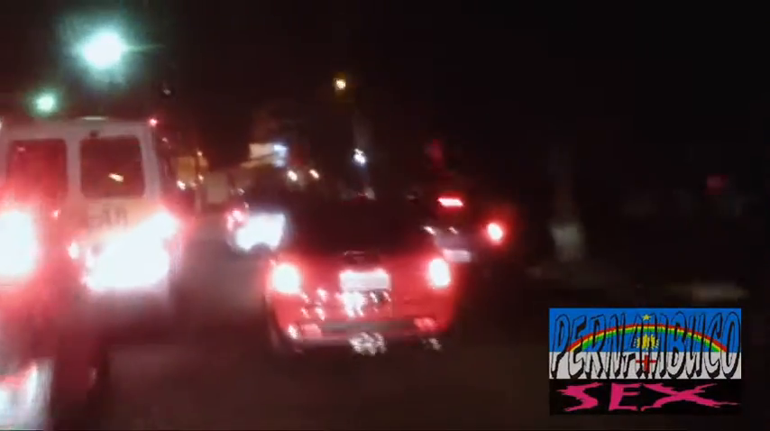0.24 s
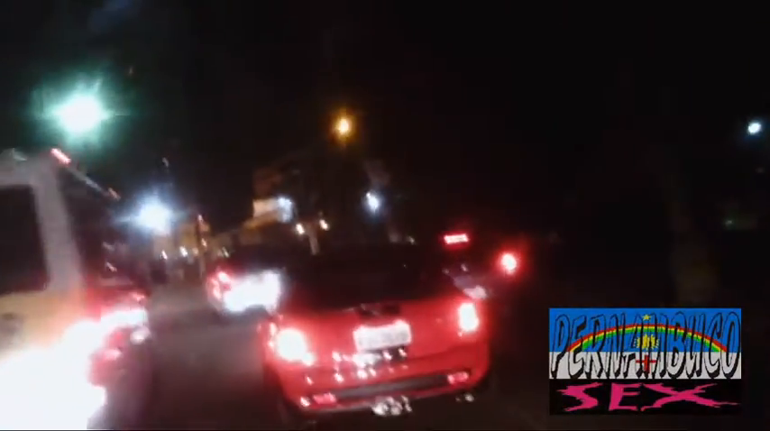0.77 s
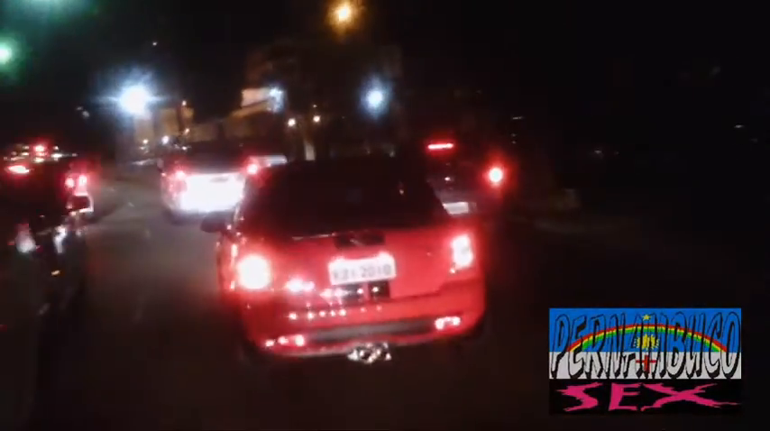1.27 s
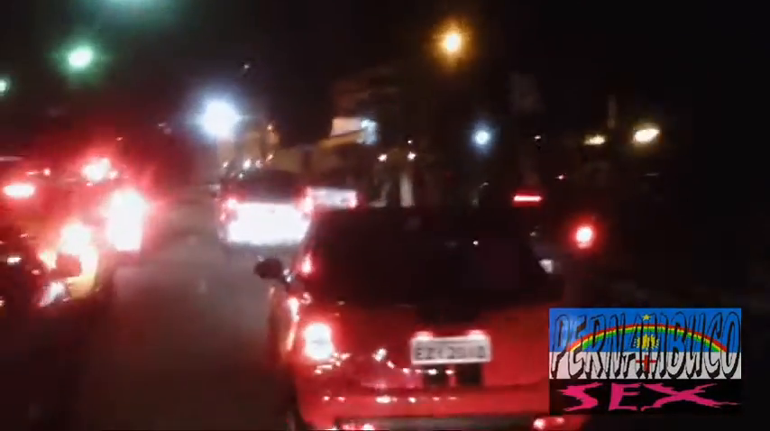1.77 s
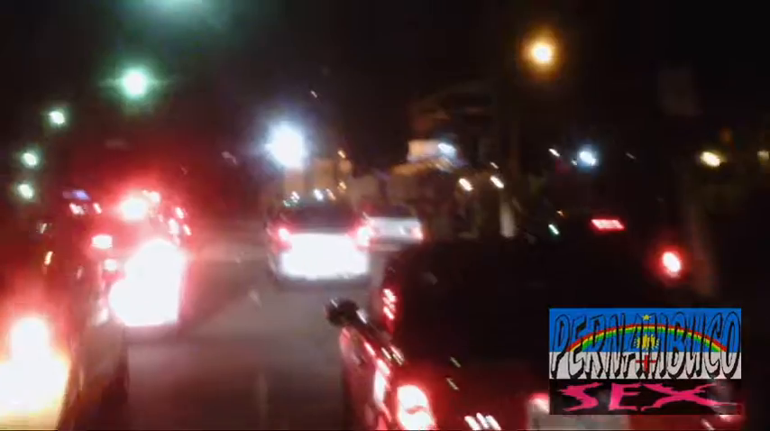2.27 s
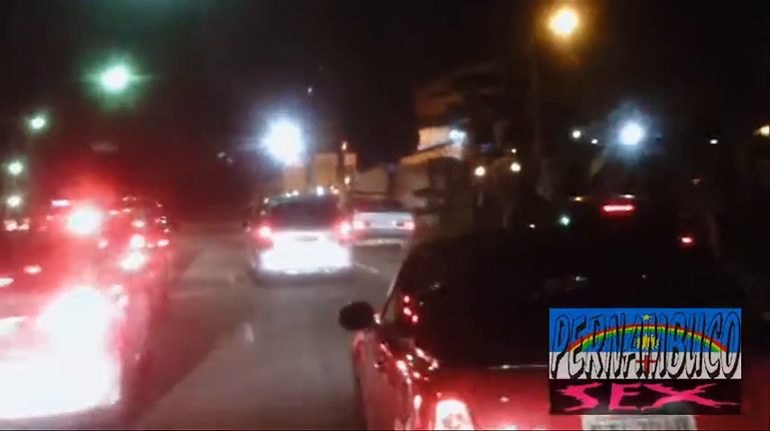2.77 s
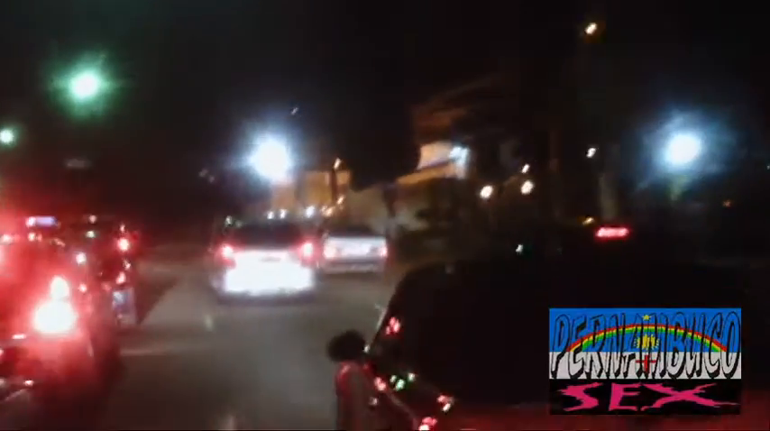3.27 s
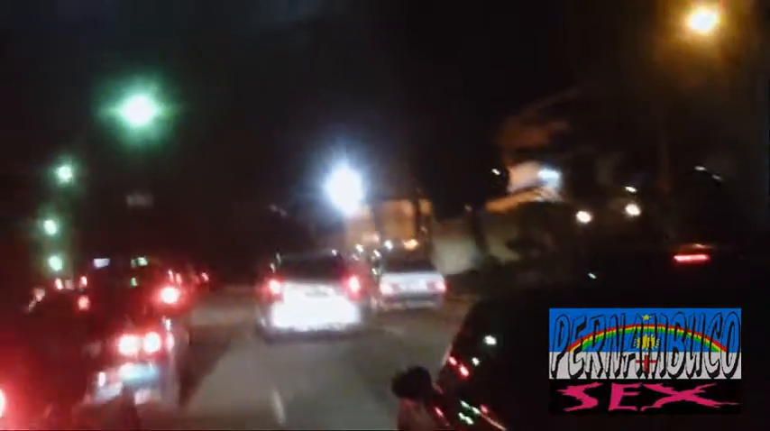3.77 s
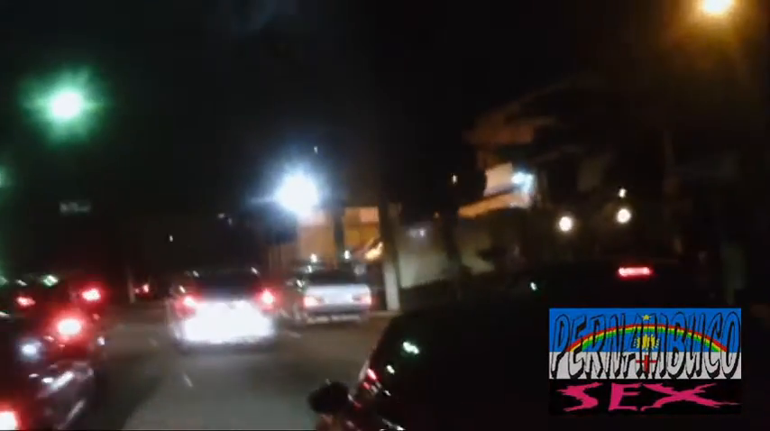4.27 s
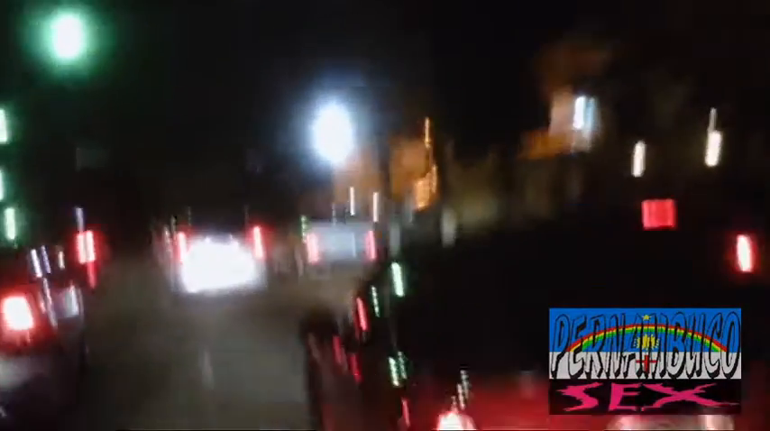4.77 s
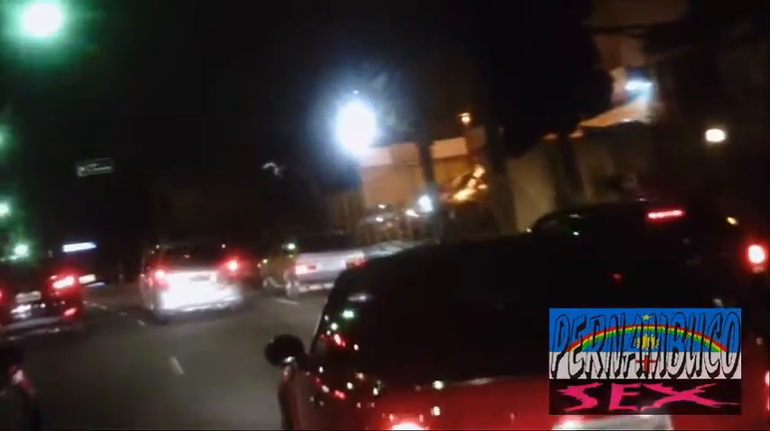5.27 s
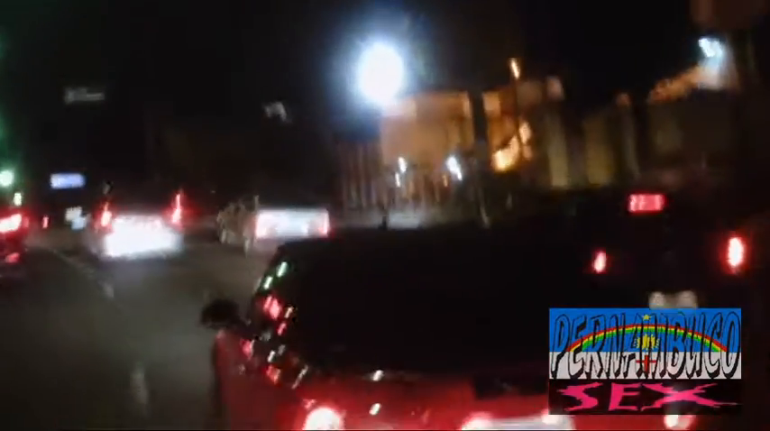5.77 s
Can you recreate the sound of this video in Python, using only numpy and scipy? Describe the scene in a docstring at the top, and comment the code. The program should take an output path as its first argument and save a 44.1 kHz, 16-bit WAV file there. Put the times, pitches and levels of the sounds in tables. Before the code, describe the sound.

Low, booming gusts of wind hit a microphone carried by a motorcycle rider in city traffic. The one-cylinder engine drones clearly at first, then grows quieter as its pitch climbs. Air keeps rushing and hissing past, with a wavering, breathy whistle that flares briefly now and then. Underneath, the hum and tyre noise of surrounding cars swell and fade, with occasional tiny squeaks.

```python
"""On a city street, a one-cylinder motorcycle speeds up between lines of humming traffic, heard from a
small camera on the rider. The exhaust drone rises in pitch and fades under the wind. Gusts boom in a
hollow at the microphone, while the air rushes past, hisses through the ringing camera case and half
whistles over an edge. Now and then something squeaks faintly."""
import sys
import numpy as np
from scipy import signal
from scipy.fft import rfft, irfft, next_fast_len
from scipy.io import wavfile

SR = 44100
rng = np.random.default_rng(int(sys.argv[2]) if len(sys.argv) > 2 else 0)


def dump(signal):
    """Clip the signal to [-1, 1] and save it as 16-bit WAV at the path in sys.argv[1]."""
    limited = np.clip(np.atleast_2d(signal).T, -1, 1)
    pcm = np.round(limited * 32767).astype(np.int16)
    wavfile.write(sys.argv[1], SR, pcm)


N = 265923


def undb(db):
    """Turn decibels into a number to multiply a sound by."""
    return 10 ** (np.asarray(db) / 20)


def unit(x):
    """Scale a sound so that its average strength (rms) is 1."""
    return x / np.sqrt(np.mean(x ** 2))


def curves(table):
    """Join the rows of a time table with straight lines, giving one value per sample."""
    time_s, *columns = np.transpose(table)
    return [np.interp(np.arange(N) / SR, time_s, column) for column in columns]


def colour(points, hz):
    """How strong each frequency is, read from rows of pitch_hz, level_db."""
    pitch_hz, level_db = np.transpose(points)
    return undb(np.interp(np.log(np.maximum(hz, 1)), np.log(pitch_hz), level_db))


def noise(gain):
    """Noise of strength 1, with its frequencies weighted by the function gain(hz)."""
    size = next_fast_len(N)
    hz = np.arange(size // 2 + 1) * SR / size
    spectrum = rfft(rng.standard_normal(size)) * gain(hz)
    return unit(irfft(spectrum, size)[:N])


def ringing(bands):
    """Noise that rings around a few pitches, given as rows of pitch_hz, width_hz, level_db."""
    def gain(f):
        peaks = [undb(db) / (1 + ((f - hz) / (0.77 * width)) ** 2) for hz, width, db in bands]
        return np.sqrt(sum(peak ** 2 for peak in peaks))
    return noise(gain)


def wander(rate_hz):
    """A smooth random curve of typical size 1 that changes about rate_hz times a second."""
    return noise(lambda f: 1 / (1 + (f / rate_hz) ** 4))


def tone(hz, waver, rate_hz):
    """A pure note whose pitch wavers by the fraction waver."""
    pitch_hz = hz * (1 + waver * wander(rate_hz))
    return np.sin(2 * np.pi * np.cumsum(pitch_hz) / SR)


def swell(start_s, length_s):
    """A rounded rise and fall of height 1."""
    progress = np.clip((np.arange(N) / SR - start_s) / length_s, 0, 1)
    return np.sqrt(np.abs(np.sin(np.pi * progress)))


def gust(start_s, length_s, rise_s=0.061, fall_s=0.076, sag_db_per_s=15):
    """The strength of one gust: it builds quickly, eases and dies away."""
    age_s = np.arange(N) / SR - start_s
    ramp = np.clip(np.minimum(age_s / rise_s, (length_s - age_s) / fall_s), 0, 1)
    return ramp * undb(-sag_db_per_s * np.clip(age_s, 0, length_s))


def traffic():
    """The cars alongside blend into a hollow hum; their tyre noise swells and fades with it."""
    # Loudness of the hum: time_s, level_db
    hum_levels = [(0, -54.5), (.8, -50), (1.3, -42.5), (2.2, -44.5), (3, -45), (3.8, -51.5), (4.6, -49),
                  (5.3, -48), (6.03, -41.5)]
    level_db, = curves(hum_levels)
    hum = ringing([(295, 47, -2.5), (355, 15, 3)])
    tyres = undb(-1.5) * ringing([(1013, 170, 0)])
    return undb(level_db) * (hum + tyres)


def squeaks():
    """Brief, unsteady two-note squeaks and breathier rasps."""
    # Squeaks: start_s, length_s, low_pitch_hz, high_pitch_hz, level_db
    squeak_events = [(1.59, .018, 4000, 7080, -48), (1.747, .013, 3955, 7110, -48),
                     (1.891, .018, 4620, 6260, -47), (2.46, .017, 3990, 7060, -46)]
    # Rasps: start_s, length_s, pitch_hz, level_db
    rasp_events = [(1.19, .006, 4350, -49), (1.824, 0.029, 1640, -49), (4.757, 0.033, 2542, -49)]
    out = 0
    for start_s, length_s, low_hz, high_hz, db in squeak_events:
        low = tone(low_hz, waver=0.01638, rate_hz=140)
        high = undb(-4) * tone(high_hz, waver=0.0122, rate_hz=240)
        out += undb(db) * swell(start_s, length_s) * (low + high)
    for start_s, length_s, hz, db in rasp_events:
        out += undb(db) * swell(start_s, length_s) * ringing([(hz, 350, 0)])
    return out


def edge_whistle(pitch_hz=1144):
    """Air blowing over an edge makes a breathy note that flutters and sometimes flares up."""
    # Sharp flares of the whistle: start_s, length_s, level_db
    flare_events = [(0.194, 0.011, -32), (.387, 0.0093, -33.5), (1.227, .012, -35), (1.652, 0.011, -27.5),
                    (2.254, 0.012, -37), (3.402, 0.016, -31), (4.42, 0.029, -32), (5.645, .016, -33)]
    flutter = undb(-46.5 + 2.5 * wander(35))
    flares = sum(undb(db) * swell(start_s, length_s) for start_s, length_s, db in flare_events)
    note = (flutter + flares) * tone(pitch_hz, waver=0.02815, rate_hz=55.9)
    breath = undb(-44.5) * ringing([(pitch_hz, 83, 0)])
    return note + breath


def wind():
    """One airflow makes a broad rush and a hiss that rings the case; both flutter as the air swirls."""
    # Strength of the air flowing past the camera: time_s, level_db
    airflow = [(0.0, -52), (0.75, -52), (0.84, -47.5), (0.99, -49.5), (1.17, -47.5), (1.48, -54),
               (1.53, -49), (1.73, -51), (1.9, -44.5), (2.01, -50), (2.4, -46), (2.99, -50), (3.11, -47),
               (3.16, -49), (3.31, -47.5), (3.54, -51.5), (3.79, -48), (4.05, -52), (4.52, -50),
               (4.72, -55), (4.77, -48.5), (4.85, -53), (5.56, -46.5), (5.86, -53), (5.89, -48.5),
               (6.03, -47)]
    # Tone colour of the rush of air and road: pitch_hz, relative_level_db
    rush_colour = [(15, 12.5), (42, 11), (75, 7), (90, 10.5), (125, 1), (185, 4), (225, 2.5), (360, 1),
                   (430, -0.5), (770, -3), (950, 0), (1250, -5.5), (1900, -19.5), (3000, -38.5)]
    # Lower pitches at which the camera case rings: pitch_hz, width_hz, relative_level_db
    case_low = [(1580, 280, -5.5), (2145, 230, -10), (2518, 260, -2), (2710, 222, 1.5), (3293, 370, -10.5),
                (4155, 550, -8.5), (4500, 496, -10.5)]
    # Higher pitches at which it rings: pitch_hz, width_hz, relative_level_db
    case_high = [(6540, 580, -6.5), (6900, 420, -8), (7720, 400, -11.5), (8357, 280, -0.5),
                 (9000, 440, -14.5), (9440, 280, -9), (9870, 158, 0)]
    air_db, = curves(airflow)
    average_db = np.mean(air_db)
    surge_db = air_db - average_db + 0.49 * wander(12.5)
    swirl_db = 0.68 * wander(28) + wander(180)
    rush = noise(lambda f: colour(rush_colour, f) / (1 + (f / 3500) ** 4))
    rush *= undb(-34.5 + 0.49 * surge_db + 0.7 * swirl_db)
    low_hiss = ringing(case_low) * undb(average_db + 0.5 + surge_db + 0.77 * swirl_db)
    high_hiss = ringing(case_high) * undb(-55 + 0.74 * surge_db + 0.65 * swirl_db + 0.63 * wander(60))
    return rush + low_hiss + high_hiss


def gust_boom(pitch_hz=57.34, lull_db=-39):
    """Gusts pump the air in a hollow at the microphone, which booms at its own low, drifting pitch."""
    # Gusts hitting the microphone: start_s, length_s, level_db
    gusts = [(0.09, 0.22, -24), (0.377, 0.26, -24.5), (0.619, 0.18, -28.5), (0.818, 0.36, -20),
             (1.13, .25, -23), (1.393, .11, -21), (1.515, .32, -16.5), (1.794, 0.24, -21.5),
             (2.02, 0.19, -21.5), (2.182, 0.2, -20.5), (2.489, 0.18, -27.5), (2.705, .23, -29),
             (3.08, .23, -24.5), (3.383, 0.26, -28.5), (3.731, .23, -22.5), (3.98, 0.23, -28.5),
             (4.28, 0.3, -34.5), (4.588, .16, -22.5), (4.748, 0.31, -22.5), (5.1, 0.23, -17.5),
             (5.354, 0.16, -29.5), (5.57, 0.36, -22), (5.863, 0.21, -23)]
    pressure = undb(lull_db) + sum(undb(db) * gust(start_s, length_s) for start_s, length_s, db in gusts)
    drifting_hz = pitch_hz * (1 + 0.0208 * wander(1.62))
    flutter = undb(0.81 * wander(14))
    return pressure * flutter * tone(drifting_hz, waver=0.0191, rate_hz=13)


def engine():
    """The cylinder fires every second turn, making a drone of many tones; a soft puff comes each turn."""
    # The engine speeding up: time_s, turns_per_s, level_db, brightness_db_per_octave
    ride = [(0, 47.3, -27.5, -4), (.4, 48.57, -28, -2.5), (1.1, 50.65, -32, 2), (1.5, 52.3, -32.5, -2.5),
            (2.1, 53.26, -33, -3.5), (2.6, 53.44, -35.5, -8.5), (3.1, 55.82, -37, -6),
            (3.6, 57.48, -38, -6), (4.2, 59.95, -41, -3.5), (5, 61.87, -36.5, -5), (5.4, 62.63, -39.5, -5),
            (6.03, 65.46, -43, -5)]
    # Exhaust tones, strongest at whole multiples: multiple_of_turn_rate, relative_level_db
    exhaust_tones = [(1, -4), (1.5, -11), (2, 0), (2.5, -14.5), (3, 1), (3.5, -24), (4, -6.5), (4.5, -31),
                     (5, -0.5), (5.5, -19), (6, -19.5), (7, -15)]
    turns_per_s, level_db, brightness = curves(ride)
    turns = np.cumsum(turns_per_s * (1 + 0.0025 * wander(7.5))) / SR
    drone = 0
    for multiple, tone_db in exhaust_tones:
        tilt_db = brightness * np.log2(multiple / 2)  # easing the throttle darkens the note
        wave = np.sin(2 * np.pi * (multiple * turns + rng.random()))
        drone += undb(tone_db + tilt_db - 5.5) * wave
    drone *= undb(0.94 * wander(22))  # no two firings are equally strong
    pulse = (1 + np.cos(2 * np.pi * turns)) ** 2
    puffs = unit(pulse * ringing([(334, 200, 2), (504, 180, -8), (1040, 290, -3)]))
    return undb(level_db) * (drone + undb(-14.5) * puffs)


def scene():
    """All the sounds meet at one microphone."""
    return (engine() + traffic() + gust_boom() + wind() + edge_whistle() + squeaks())[None]


def record(dry):
    """The camera sharply cuts off the highest treble."""
    cutoff_hz = 10150
    return signal.sosfilt(signal.ellip(8, .2, 80, cutoff_hz, fs=SR, output="sos"), dry)


dry = scene()
out = record(dry)
dump(out)
```